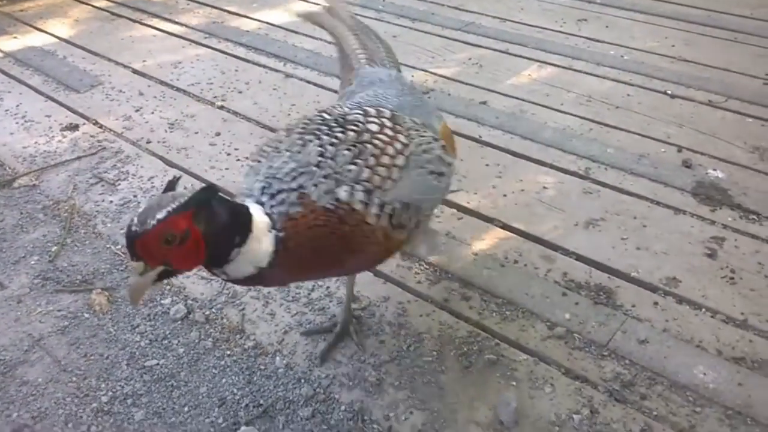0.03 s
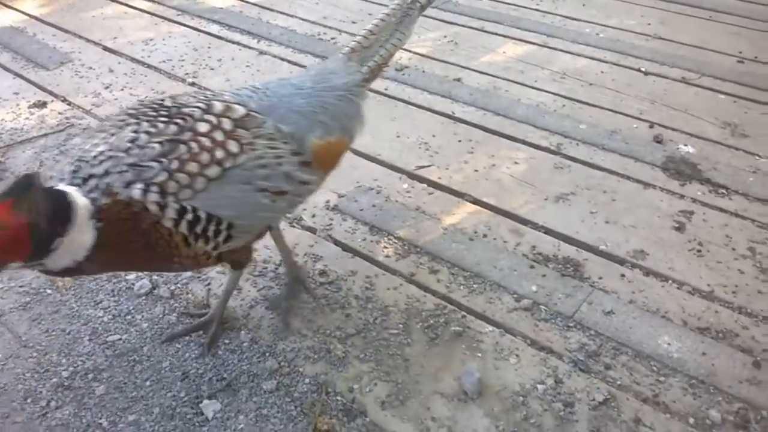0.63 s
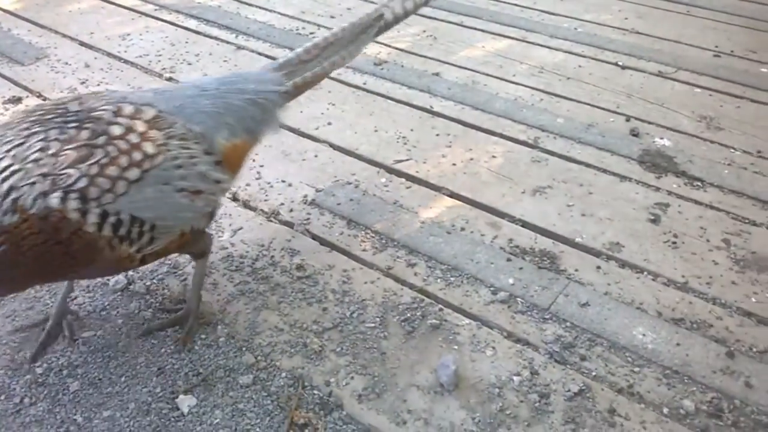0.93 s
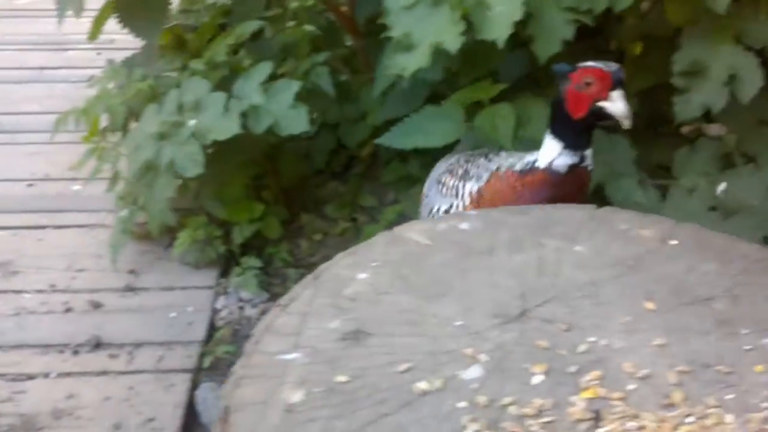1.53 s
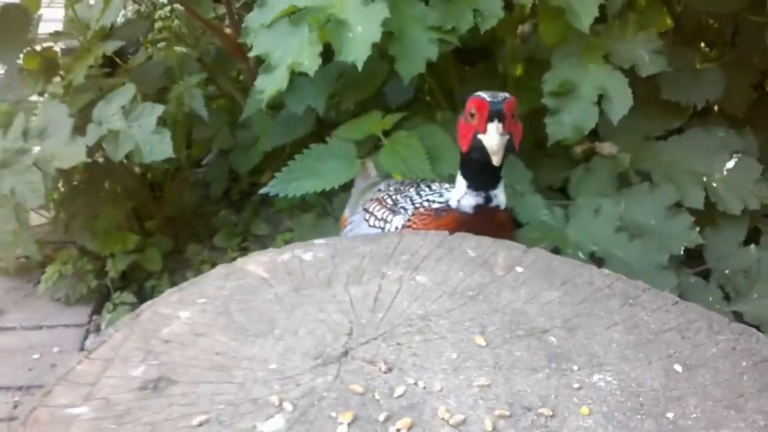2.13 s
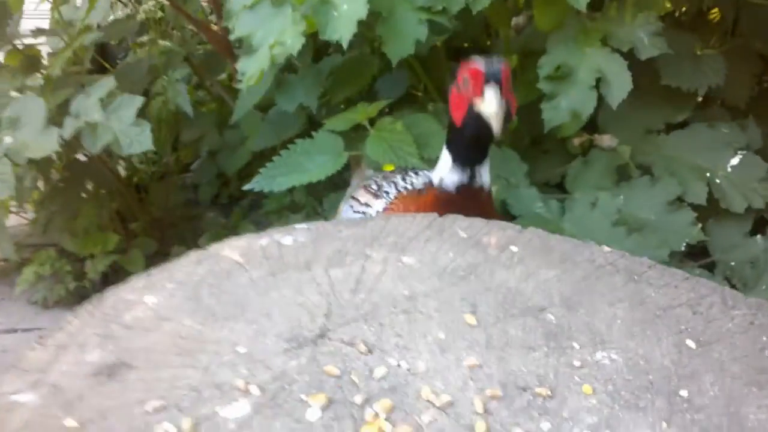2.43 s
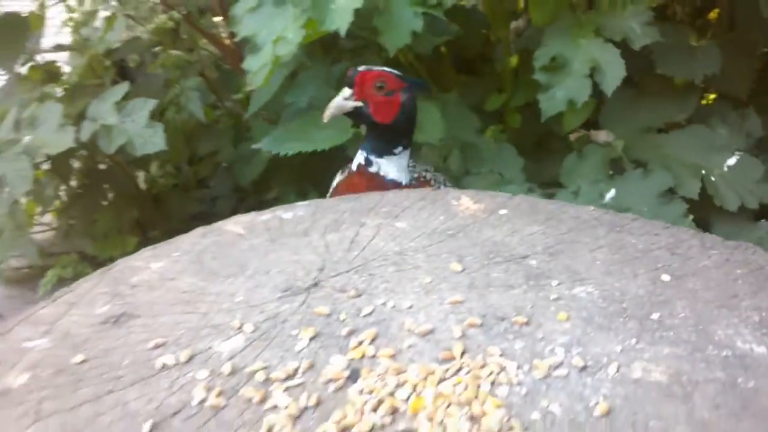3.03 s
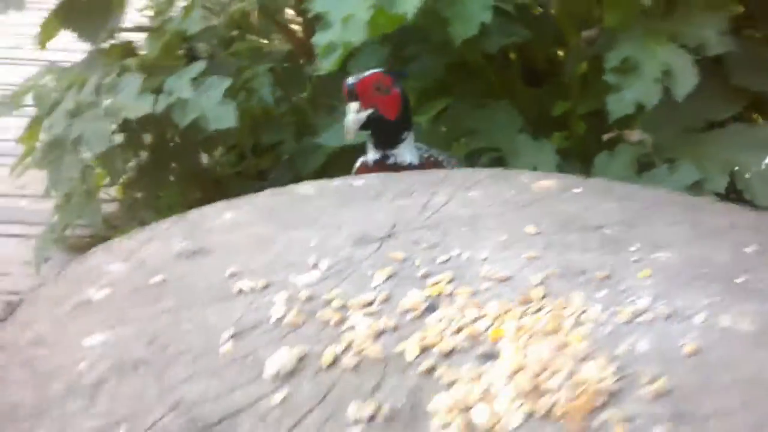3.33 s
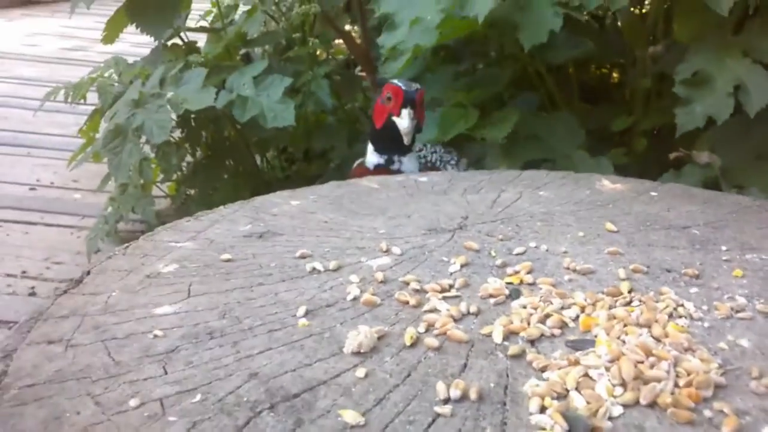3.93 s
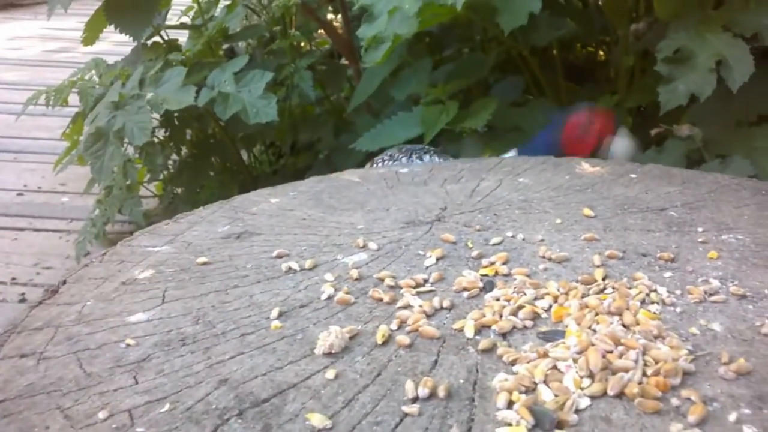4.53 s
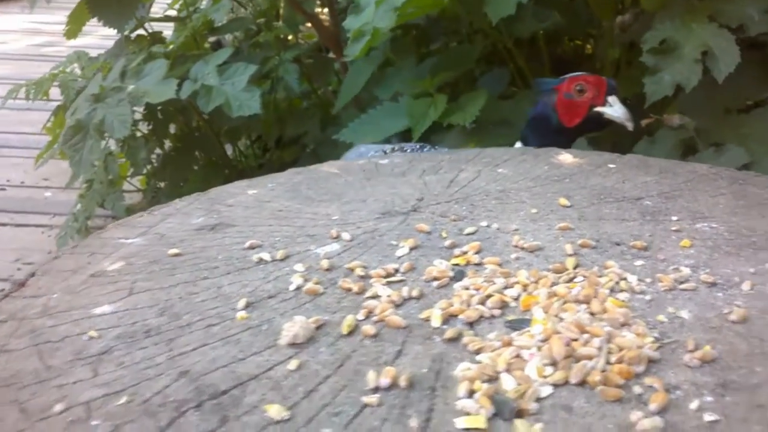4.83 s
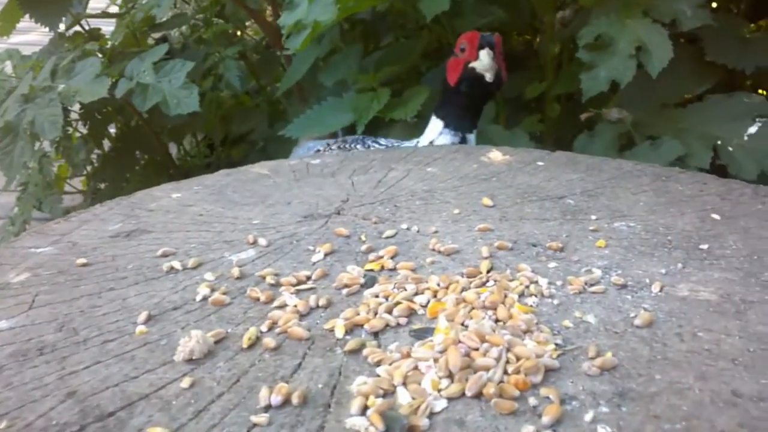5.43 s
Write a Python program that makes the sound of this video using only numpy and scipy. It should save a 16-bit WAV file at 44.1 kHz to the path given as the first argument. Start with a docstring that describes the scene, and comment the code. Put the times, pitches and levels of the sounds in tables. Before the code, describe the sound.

A soft, low outdoor hush runs throughout. At about 0.1 seconds a pheasant's claws tap lightly on hollow boards, and again near 0.9, followed by a sharp tick of grit. Low wind puffs nudge the microphone during the first 1.2 seconds, with a few dull finger bumps. From 1.6 to 2.2 seconds comes a cluster of gravel clicks over a faint crunch, loudest at 1.9, with two more near 2.7. A sleeve brushes the microphone between 1.8 and 2.6, and fingers knock the casing around 1.8, 2.2, 3.2 and 3.4. Small distant birds whistle and buzz faintly with a woodland echo from 1 second on, busiest between 2.5 and 3.4, including one very high, thin note. After a quieter stretch and a single tick at 4.5, a small bird close by gives two sharp rising chirps at 4.8 and 5.1, each starting hoarse and ending pure.

```python
"""A pheasant at the edge of a wood

A pheasant walks over ticking gravel and hollow boards, followed by a hand-held microphone.
Wind nudges the microphone, a sleeve brushes past and fingers bump the casing.
Small birds whistle and buzz in the echoing trees, and one close by gives two sharp rising chirps.
Birds are gliding sine waves, knocks are dying tones, and rustles are showers of tiny clicks."""
import sys
import numpy as np
from scipy import signal
from scipy.fft import rfft, irfft
from scipy.io import wavfile

SR = 44100
rng = np.random.default_rng(int(sys.argv[2]) if len(sys.argv) > 2 else 0)


def generate_wav(sig):
    """Save sig (samples, or channels by samples) to the path in sys.argv[1] as 16-bit PCM at SR."""
    pcm = np.round(np.clip(np.atleast_2d(sig).T, -1, 1) * 32767).astype(np.int16)
    wavfile.write(sys.argv[1], SR, pcm)


N = 250929
TIME = np.arange(N) / SR


def from_db(db):
    """Turn decibels into a gain to multiply by."""
    return 10 ** (np.asarray(db) / 20)


def unit_level(x):
    """Scale a sound to an average power of 1."""
    return x / np.sqrt(np.mean(x ** 2) + 1e-20)


def swells(rows):
    """A loudness curve: each swell rises to its peak and dies away, and their powers add."""
    power = sum(from_db(2 * db) * np.exp(-2 * np.maximum((s - TIME) / rise_s, (TIME - s) / fall_s))
                for s, db, rise_s, fall_s in rows)
    return np.sqrt(power)


def smooth_step(t, middle_s, width_s):
    """Go smoothly from 0 to 1."""
    return .5 + .5 * np.tanh((t - middle_s) / (2 * width_s))


def drift(per_s, size=N):
    """Wander around zero by about 1, turning at random per_s times a second."""
    points = rng.standard_normal(8000)
    return np.interp(np.arange(size) * per_s / SR, np.arange(len(points)), points) * np.sqrt(3 / 2)


def coloured(x, spectrum):
    """Shape a sound's lows and highs to a spectrum, at an average power of 1."""
    hz, db = np.transpose(spectrum)
    f = np.maximum(np.fft.rfftfreq(N, 1 / SR), 1)
    gain = from_db(np.interp(np.log(f), np.log(hz), db))
    edge_fade = np.minimum(f / hz[0], 1) ** 2 * np.minimum(hz[-1] / f, 1) ** 2
    return unit_level(irfft(rfft(x) * gain * edge_fade, N))


def grains(per_s, spread_db):
    """Random clicks of uneven size."""
    sizes = from_db(spread_db * np.minimum(rng.exponential(1, N), 4))
    return (rng.random(N) < per_s / SR) * sizes * rng.choice([-1, 1], N)


def ring(x, hz, t60):
    """Each click sets a tone ringing; t60 is the seconds it takes to fade by 60 dB."""
    decay, angle = from_db(-60 / (t60 * SR)), 2 * np.pi * hz / SR
    return signal.lfilter([0, np.sin(angle)], [1, -2 * decay * np.cos(angle), decay ** 2], x + 1e-18)


def band(x, low_hz, high_hz):
    """Keep what lies between two frequencies."""
    return signal.sosfilt(signal.butter(2, [low_hz, high_hz], "band", fs=SR, output="sos"), x)


def add(out, s, sound):
    """Mix a sound in, starting at s seconds."""
    at = max(round(s * SR), 0)
    out[at:at + len(sound)] += sound[:max(N - at, 0)]


# Outdoor hush. Each row: frequency in Hz, relative strength in dB.
AIR_SPECTRUM = [(25, -21), (70, -3.5), (166, 1.5), (262, -5), (350, -6.5), (600, -9), (1100, -11),
                (1700, -10.5), (2300, -15), (2900, -18.5), (5000, -19.5), (8000, -30.5), (16000, -32)]
def air(level_db=-63.5):
    """A soft, low hush whose level wanders slightly."""
    return from_db(level_db + .5 * drift(7.5)) * coloured(rng.standard_normal(N), AIR_SPECTRUM)


# Wind rumble. Each row: frequency in Hz, relative strength in dB.
WIND_SPECTRUM = [(25, -18), (45, -1), (75, 6.5), (130, -3.5), (200, -11), (350, -24.5), (700, -32)]
# Each row: peak time in seconds, relative level in dB, rise and fall in seconds.
WIND_PUFFS = [(.01, -50, 0.017, 0.2), (.137, -40, 0.0081, 0.017), (.36, -57.5, 0.051, 0.27),
              (.65, -50, 0.019, 0.016), (.87, -48, 0.07, 0.218), (1.06, -48, 0.0235, 0.069),
              (1.18, -53, .03, 0.031)]
def wind(gain_db=0.5, lumps_db=3.0):
    """Wind buffets the microphone in short, lumpy puffs."""
    lumps = from_db(gain_db + lumps_db * drift(30.35))
    return swells(WIND_PUFFS) * lumps * coloured(rng.standard_normal(N), WIND_SPECTRUM)


# Crinkling and rubbing cloth. Each row: frequency in Hz, relative strength in dB.
CREASE_SPECTRUM = [(700, -12), (1600, -3.5), (2500, -4), (3500, -6.5), (4600, -15.5), (5600, -11.5),
                   (7000, -20.5), (9300, -21), (11000, -28.5), (16000, -45)]
SLEEVE_SPECTRUM = [(60, -18.5), (150, -12.5), (240, -2), (390, 2), (540, -6), (850, -6), (1400, -15.5),
                   (2500, -34.5), (5000, -37.5), (9000, -51), (14000, -65)]
# Cloth movements. Each row: peak time in seconds, relative level in dB, rise and fall in seconds.
CREASE_SWELLS = [(1.73, -58.5, 0.085, 0.124), (1.86, -53, .05, .12), (2.0, -53, 0.067, 0.049),
                 (2.125, -50, 0.047, 0.015), (2.2, -56.5, 0.025, 0.11), (2.66, -54, 0.14, 0.11),
                 (3.35, -74, 0.225, .25)]
SLEEVE_BRUSHES = [(1.85, -35.5, .008, 0.0282), (1.917, -42.5, 0.027, 0.024), (2.0, -47, 0.039, 0.059),
                  (2.12, -52, 0.039, 0.0546), (2.356, -33.5, 0.013, 0.024), (2.42, -46, 0.04, .04),
                  (2.51, -48.5, 0.05, 0.049), (2.64, -55, 0.098, 0.083)]
def cloth(snap_db=-5):
    """Cloth creases and snaps, and a sleeve sticks and slips on the microphone's casing."""
    folds = coloured(grains(per_s=3500, spread_db=2.7) * from_db(4.4 * drift(130)), CREASE_SPECTRUM)
    snaps = sum(ring(grains(per_s=26, spread_db=3.8), hz, t60=0.0052) for hz in (1660, 2192, 2640, 3260))
    creases = swells(CREASE_SWELLS) * (folds + from_db(snap_db) * unit_level(snaps))
    sleeve = swells(SLEEVE_BRUSHES) * coloured(grains(per_s=6000, spread_db=1.2), SLEEVE_SPECTRUM)
    return creases + sleeve


# Each row: multiple of the bump's pitch, relative level in dB, ring time in seconds.
CASING_TONES = [(0.621, -7.5, 0.019), (1.05, -1, 0.017), (1.65, -9.5, 0.0187), (2.6, -16.5, 0.0204)]
# Each row: start in seconds, relative level in dB, pitch in Hz that it slides through, hardness in dB.
FINGER_BUMPS = [(0.129, -41.5, 135, -26), (0.529, -41.5, 112, -40), (0.935, -34.5, 96.4, -30),
                (1.056, -37, 93, -38), (1.827, -35, 224, -38), (1.843, -32.5, 250.3, -40),
                (2.333, -40, 281, -15), (2.2361, -27.5, 106.2, -5.5), (3.2285, -31.5, 115, -8),
                (3.408, -30.5, 122.6, -7.5), (3.751, -42, 113.4, -7.5)]
def finger_bumps(sag=0.47, sag_s=0.016, chatter_s=0.0063, click_db=-2, attack_s=0.001154):
    """Fingers hit the casing with a click; its tones sink and are choked as the grip closes."""
    thuds, clicks, t = np.zeros(N), np.zeros(N), TIME[:6000]
    snap_and_chatter = np.exp(-t / 0.0009) + 0.5 * np.exp(-t / chatter_s)
    for s, db, hz, hard_db in FINGER_BUMPS:
        sinking_hz = hz * (1 + sag * (np.exp(-t / sag_s) - .3))
        phase = 2 * np.pi * np.cumsum(sinking_hz) / SR
        tones = sum(from_db(tone_db) * np.exp(-(t / ring_s) ** 2) * np.cos(ratio * phase)
                    for ratio, tone_db, ring_s in CASING_TONES)
        add(thuds, s, -from_db(db) * tones * (1 - np.exp(-t / attack_s)))
        add(clicks, s, from_db(db + hard_db + click_db) * snap_and_chatter)
    return band(thuds, 64, 1200) + contact_clicks(clicks)


# A finger's click. Each row: frequency in Hz, relative strength in dB.
CLICK_SPECTRUM = [(250, 1), (700, 1.5), (1500, -2), (2700, -17), (4000, -11.5), (5700, 0), (7500, -17),
                  (10000, -50), (14000, -42)]
def contact_clicks(loudness):
    """Hard contact makes bursts of noise that follow a loudness curve."""
    return band(loudness * coloured(rng.standard_normal(N), CLICK_SPECTRUM), 210, 8000)


def tree_echo(x, t60, delay_s):
    """Trunks and leaves scatter a sound into a dense, dying tail."""
    t = TIME[:SR]
    tail = rng.standard_normal(SR) * from_db(-60 * t / t60) * (t > delay_s)
    return signal.fftconvolve(x, tail / np.linalg.norm(tail))[:N]


# Each row: start in seconds, length in seconds, pitch in Hz, relative level in dB.
BUZZY_NOTES = [(1.103, 0.112, 3770, -63.5), (1.228, 0.021, 3330, -62), (1.248, 0.048, 3780, -60.5),
               (2.947, 0.057, 7230, -65.5), (3.017, 0.0457, 5200, -60.5), (3.113, 0.029, 5170, -57.5)]
def far_buzzes(depth_hz=280, scoop_share=0.133, trill_hz=140):
    """Birds in the trees scoop up to a pitch and trill fast and unevenly around it."""
    out = np.zeros(N)
    for s, length, hz, db in BUZZY_NOTES:
        t = TIME[:round(length * SR)]
        scoop = 1 - scoop_share * np.exp(-t / 0.00705)
        trill = 0.45 * np.sin(2 * np.pi * trill_hz * t) + 0.8 * drift(710, len(t))
        phase = 2 * np.pi * np.cumsum(hz * scoop + depth_hz * trill) / SR
        add(out, s, from_db(db) * signal.windows.tukey(len(t), .3) * np.sin(phase))
    return out


# Each row: start and length in seconds, first, middle and last pitch in Hz, relative level in dB.
WHISTLES = [(0.977, 0.085, 2350, 2350, 2316, -60), (1.443, 0.02, 2580, 2560, 2640, -58),
            (1.467, .1, 7050, 6887, 6900, -68), (2.1, 0.026, 8000, 8030, 8130, -56.5),
            (2.266, .08, 2330, 2330, 2210, -57), (2.34, 0.061, 2220, 2063, 1960, -53),
            (2.58, 0.17, 9450, 9820, 9040, -43.5), (2.573, 0.18, 8330, 8370, 7730, -47),
            (2.724, 0.11, 5400, 5074, 4920, -54), (2.76, 0.048, 2580, 2426, 2416, -45),
            (3.032, .08, 1910, 1942, 1961, -50.5), (3.11, 0.095, 1950, 1960, 1970, -51),
            (3.206, 0.074, 1970, 1966, 1920, -55), (3.197, 0.114, 3450, 3353, 3320, -66),
            (3.262, 0.063, 2330, 2157, 2180, -45.5), (3.315, 0.1098, 2433, 2523, 2363, -47),
            (3.525, 0.098, 7450, 7230, 7200, -73), (3.916, .16, 2210, 2291, 2180, -62.5),
            (4.298, 0.23, 1960, 1933, 1913, -59.5), (4.925, 0.051, 2350, 2290, 2228, -63.5),
            (4.992, 0.072, 2250, 2480, 2100, -64)]
def far_whistles(waver_share=0.008, flicker_db=1.5, arch_db=10):
    """Whistles waver and flicker through the leaves; the highest bird sings with two voices at once."""
    out = np.zeros(N)
    for s, length, start_hz, middle_hz, end_hz, db in WHISTLES:
        size = round(length * SR)
        along = np.linspace(-1, 1, size)
        hz = np.polyval(np.polyfit([-1, 0, 1], [start_hz, middle_hz, end_hz], 2), along)
        phase = 2 * np.pi * np.cumsum(hz * (1 + waver_share * drift(290, size))) / SR
        level = from_db(db - arch_db * along ** 2 + flicker_db * drift(96, size))  # softer at the ends
        add(out, s, signal.windows.tukey(size, .08) * level * np.sin(phase))
    return out


# Each row: start and length in seconds, held pitch in Hz, accent level in dB, swell level in dB.
CLOSE_CHIRPS = [(4.833, 0.1043, 4090, -29, -34.5), (5.086, 0.099, 3963, -26.5, -36)]
def close_chirps(sweep_share=.36, creep_hz_per_s=440, lock_s=.024, swell_s=0.082, flutter_hz=210):
    """Each chirp starts hoarse and rich, sweeps up and locks on to a pure, slowly rising whistle."""
    out = np.zeros(N)
    for s, length, pitch_hz, accent_db, swell_db in CLOSE_CHIRPS:
        t = TIME[:round(length * SR)]
        sweep = 1 - sweep_share * (1 - smooth_step(t, middle_s=0.02, width_s=.0035))
        hz = pitch_hz * sweep + creep_hz_per_s * (t - swell_s)
        rasp = 1 - smooth_step(t, middle_s=0.02, width_s=0.0029)
        phase = 2 * np.pi * np.cumsum(hz * (1 + 0.093 * rasp * drift(1160, len(t)))) / SR
        overtone = from_db(-48) + rasp ** 2 * from_db(-3)
        tone = (1 - .5 * rasp) * np.sin(phase) + overtone * np.sin(2 * phase)
        flutter = 1 + 0.3 * np.sqrt(rasp) * np.sin(2 * np.pi * flutter_hz * t)
        hiss = rasp * from_db(-4) * unit_level(band(rng.standard_normal(len(t)), 3000, 3970))
        # The hoarse start grows, the lock brings a dying accent, and a swell follows.
        hoarse = from_db(-44.5 + 327 * np.minimum(t - lock_s, 0))
        locked = smooth_step(t, lock_s, width_s=.0005)
        accent = from_db(accent_db) * np.exp(-np.maximum(t - lock_s, 0) / 0.029)
        swell = from_db(swell_db) * np.exp(-((t - swell_s) / 0.019) ** 2)
        edge_fade = np.minimum(np.minimum(t, length - t) / 0.0038, 1)
        level = edge_fade * ((1 - locked) * hoarse + locked * (accent + swell))
        add(out, s, level * (flutter * tone + hiss))
    return out


# Gravel crunch. Each row: frequency in Hz, relative strength in dB.
GRAVEL_SPECTRUM = [(300, -19), (700, -3), (1100, -3), (1700, 4), (2400, -4), (3000, -9.5), (4500, -16),
                   (7000, -23.5), (12000, -72)]
# Each row: peak time in seconds, relative level in dB, rise and fall in seconds.
GRAVEL_SHIFTS = [(.1, -66, 0.16, 0.48), (1.2, -62, 1, 0.221), (1.7, -59.5, 0.026, 0.096),
                 (1.9, -58.5, 0.15, .2), (2.68, -58, 0.3, 0.25), (3.35, -68.5, 0.235, .35)]
def gravel(gain_db=4.5, rest_db=-75):
    """Gravel shifts in thousands of fine grains, never quite falling silent."""
    level = np.hypot(from_db(gain_db) * swells(GRAVEL_SHIFTS), from_db(rest_db))
    return level * coloured(grains(per_s=12000, spread_db=2.9), GRAVEL_SPECTRUM)


# Each row: start in seconds, relative level in dB, pitch in Hz, crispness in dB.
GRIT_TICKS = [(0.088, -38, 1290, -14.5), (0.115, -35.5, 1300, -17), (0.9585, -21, 1550, -19.5),
              (1.573, -36, 1780, -21.5), (1.589, -37.5, 1700, -13.5), (1.655, -38.5, 1850, -13.5),
              (1.691, -29, 1686, -33), (1.72, -35, 2490, -32), (1.794, -31.5, 1960, -13),
              (1.921, -15, 1580, -51), (1.954, -42, 1644, -12), (2.001, -36, 1970, -19),
              (2.013, -23, 2030, -14), (2.021, -27, 3000, -18), (2.083, -31, 1880, -17),
              (2.159, -39, 1710, -3), (2.179, -27, 1720, -16.5), (2.197, -30, 2410, -14.5),
              (2.213, -36, 1650, -14), (2.662, -36, 2600, -11), (2.797, -29, 2480, -15.5),
              (4.477, -33.5, 1520, -14.5)]
def grit_ticks(body_t60=0.0074, upper_t60=0.0026, crack_t60=0.0096, scatter_t60=0.03):
    """Grit and seeds knock with two short tones, a crack and a little scatter."""
    out, t = np.zeros(N), TIME[:2000]
    dull = signal.butter(3, 3900, fs=SR, output="sos")
    attack = 1 - np.exp(-t / 0.0001965)
    for s, db, hz, crisp_db in GRIT_TICKS:
        noise = rng.standard_normal((2, len(t)))
        body = np.sin(2 * np.pi * hz * t) * from_db(-2 - 60 * t / body_t60)
        upper = np.sin(2 * np.pi * 1.47 * hz * t) * from_db(-7 - 60 * t / upper_t60)
        reach_hz = np.interp(crisp_db, [-20, -10], [5000, 9500])  # crisper cracks reach higher
        crack = 2 * band(noise[0], 2300, reach_hz) * from_db(crisp_db - 1 - 60 * t / crack_t60)
        scatter = 3 * band(noise[1], 830, 2470) * from_db(-21 - 60 * t / scatter_t60)
        knock = signal.sosfilt(dull, (body + upper) * attack + scatter)
        add(out, s + 0.000898, from_db(db) * (knock + crack))
    return signal.sosfilt(signal.butter(8, 9800, fs=SR, output="sos"), out)


# Each row: pitch in Hz, relative level in dB, seconds to fade by 60 dB.
PLANK_TONES = [(517.6, -5, 0.035), (550.5, -7.5, 0.033), (1294, -23, 0.045)]
# Each row: start in seconds, relative level in dB.
CLAW_TAPS = [(.090, -44), (0.115, -41), (.919, -50)]
def pheasant_steps():
    """Claws tap the boardwalk and the hollow plank rings briefly."""
    taps = np.zeros(N)
    for s, db in CLAW_TAPS:
        taps[round(s * SR)] = from_db(db)
    return sum(from_db(db) * ring(taps, hz, t60) for hz, db, t60 in PLANK_TONES)


def scene():
    """Mix to one channel: near sounds have little or no echo, far birds carry the wood's echo."""
    chirps, whistles, buzzes = close_chirps(), far_whistles(), far_buzzes()
    near = chirps + from_db(-16.5) * tree_echo(chirps, t60=0.31, delay_s=0.011)
    far = from_db(-4) * whistles + from_db(-2.5) * buzzes
    early_echo = tree_echo(from_db(-4.5) * whistles + buzzes, t60=0.25, delay_s=0.0092)
    late_echo = tree_echo(band(whistles + buzzes, 1600, 5400), t60=0.64, delay_s=0.021)
    birds = near + far + early_echo + from_db(-10.5) * late_echo
    return (birds + air() + grit_ticks() + finger_bumps() + pheasant_steps()
            + gravel() + cloth() + wind())[None]


def record(dry, cutoff_hz=15900):
    """Cut the very highest treble steeply."""
    return signal.sosfilt(signal.ellip(10, .1, 70, cutoff_hz, fs=SR, output="sos"), dry)


dry = scene()
out = record(dry)
generate_wav(out)
```